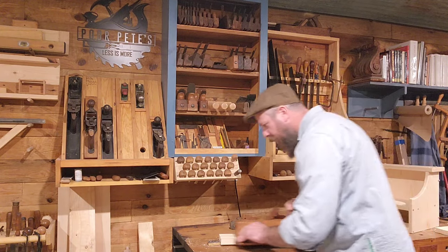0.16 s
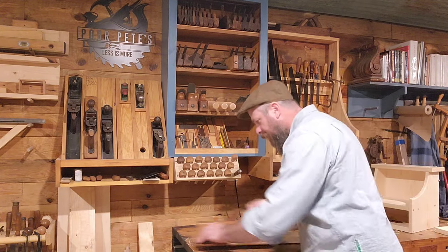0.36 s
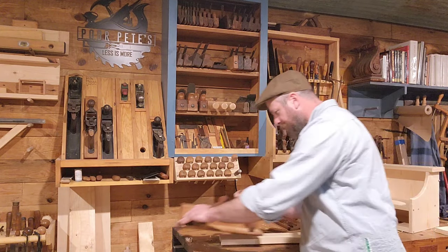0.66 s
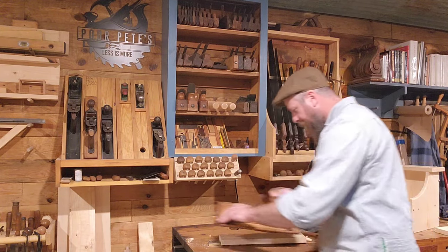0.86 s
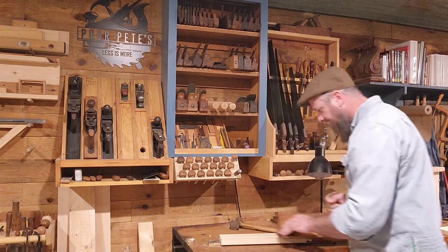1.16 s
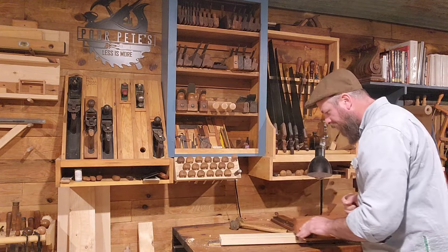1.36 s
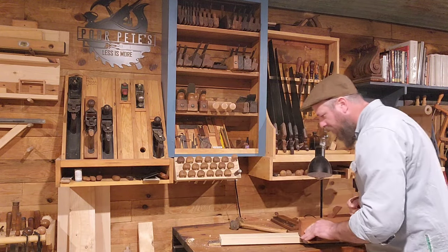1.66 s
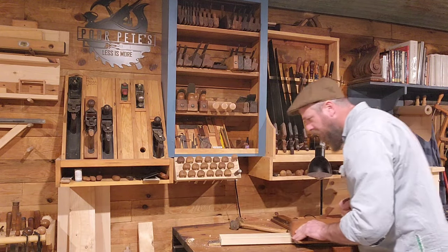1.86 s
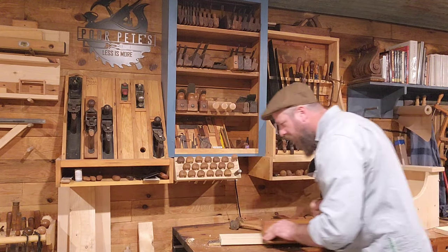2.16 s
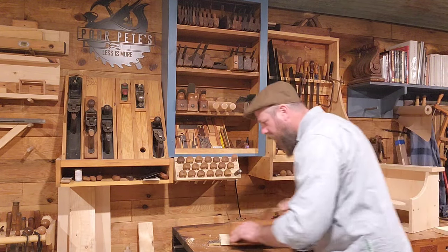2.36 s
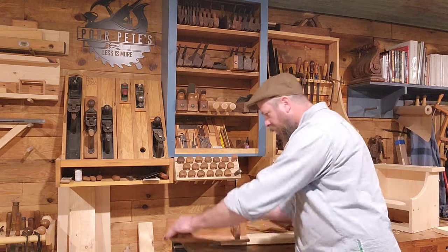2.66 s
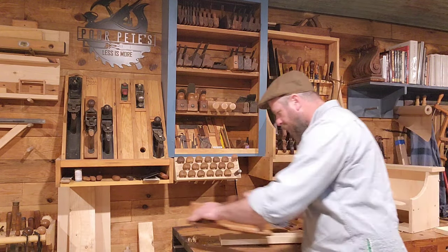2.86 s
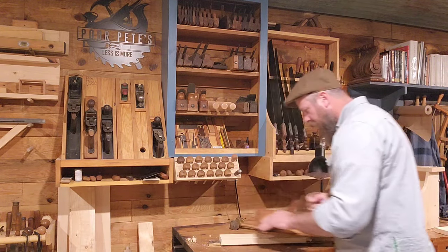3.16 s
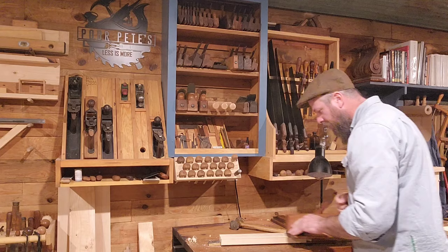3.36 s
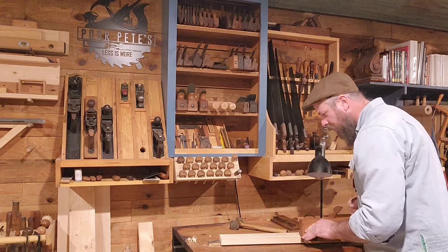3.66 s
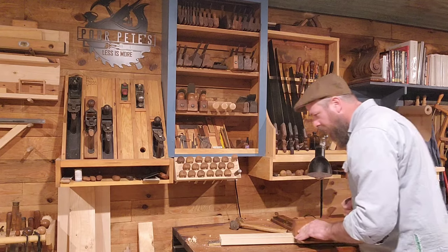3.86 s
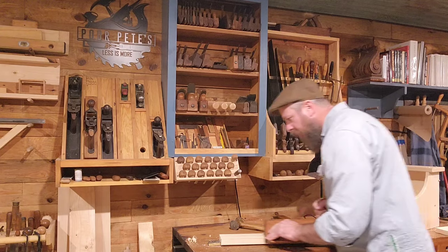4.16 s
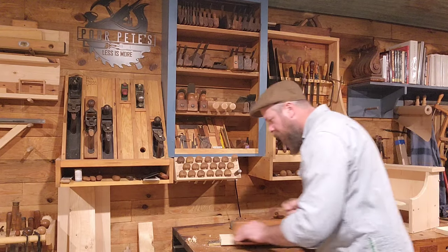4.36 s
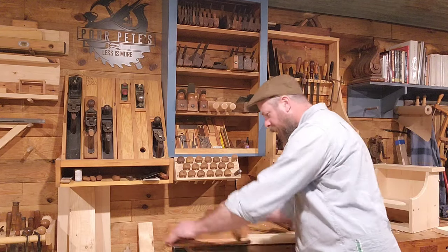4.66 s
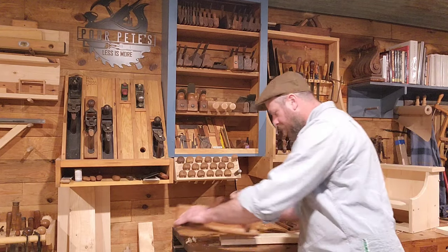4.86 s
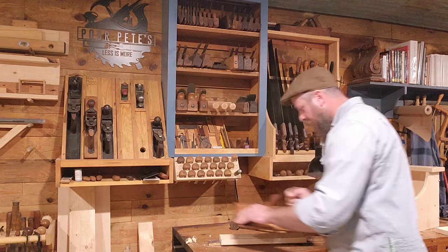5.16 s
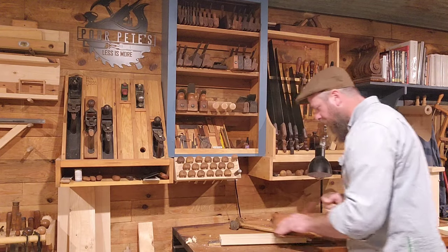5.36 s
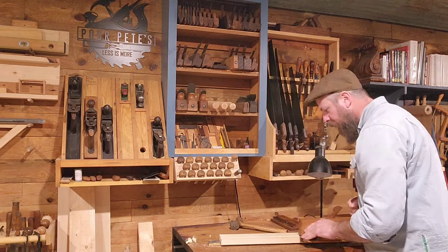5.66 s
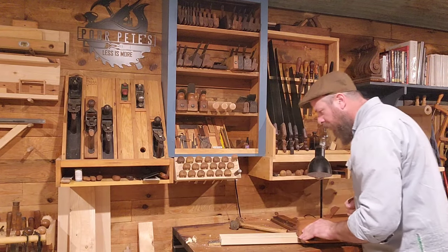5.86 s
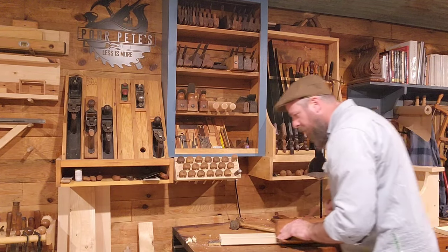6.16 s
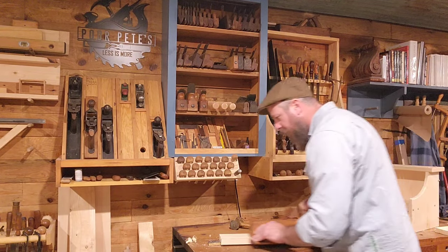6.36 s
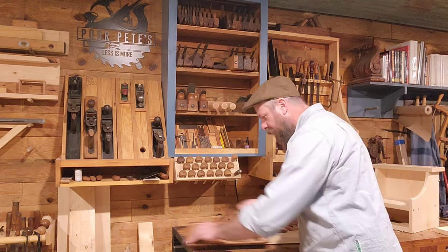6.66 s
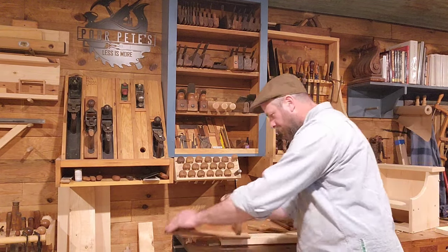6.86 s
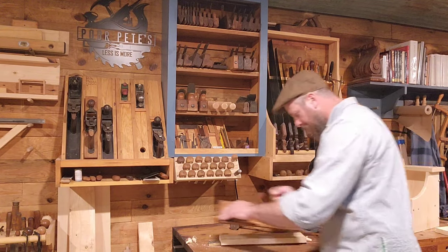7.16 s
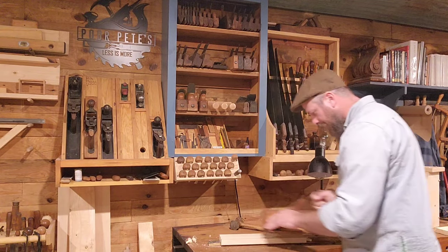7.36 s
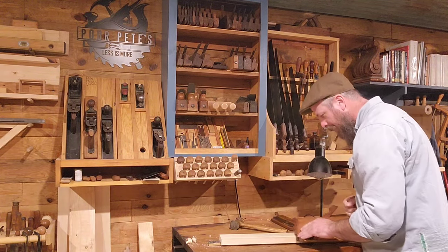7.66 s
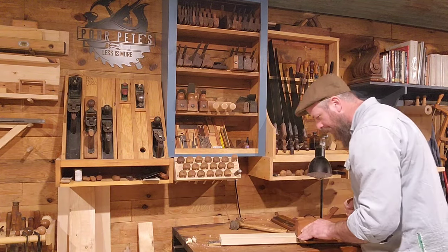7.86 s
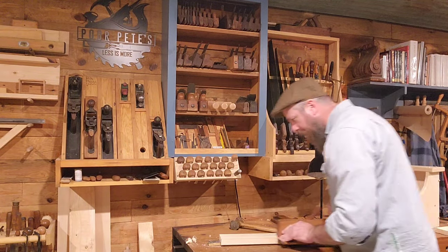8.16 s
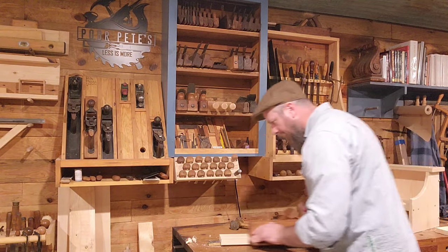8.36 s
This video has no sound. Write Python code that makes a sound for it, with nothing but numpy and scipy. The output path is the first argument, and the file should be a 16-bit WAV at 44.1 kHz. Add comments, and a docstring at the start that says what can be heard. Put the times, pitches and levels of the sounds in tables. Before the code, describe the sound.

Repeated hand planing on a workbench: the first stroke is already starting, then four more at an unhurried, regular pace. The wood sings in a mid-pitched, buzzing scrape with brief chattering notes, growing louder and faster toward the far end, where it breaks off. Quiet gaps hold only faint brushing, then double clunks as the tool lands and a slight slide before the next bite. Short, woody room reflections; quiet room rumble beneath.

```python
"""A wooden plough plane cuts a groove along a board on a workbench, five strokes in a small timber-lined shop.
Snapping fibres are a train of impulses, ever faster along the stroke: they excite the board's modes,
shake plane and bench in a judder and hiss in the shaving, while the iron briefly chatters on single notes.
Between strokes decaying noise through resonances gives knocks and thuds, and shaped noise the rubbing wood.
Decaying reflections make the shop, over low rumble, a faint hum and hiss."""
import sys
import numpy as np
from scipy import signal
from scipy.fft import rfft, irfft, next_fast_len
from scipy.io import wavfile
from scipy.ndimage import uniform_filter1d, map_coordinates

SR = 44100
rng = np.random.default_rng(int(sys.argv[2]) if len(sys.argv) > 2 else 0)


def bounce(signal):
    """Save signal as a 16-bit WAV file at the path given by the first command-line argument."""
    frames = np.transpose(np.atleast_2d(signal))
    limited = np.clip(frames, -1, 1)
    pcm = np.round(limited * 32767).astype(np.int16)
    wavfile.write(sys.argv[1], SR, pcm)


N = 375291

# Levels in the tables are relative: each source applies its own gain, and the shop filters the sum.
# strokes of the plane: iron bites t/s, length/s, stall before the board sings/s, board level/dB,
# shaving hiss level/dB, starting judder level/dB, starting judder length/s, bench thud at the end level/dB,
# run-out rub level/dB, run-out length/s
STROKES = [(-0.06, 0.6, 0.0096, -31.5, -42.5, -38, .11, -47, -56.5, 0.14),
           (2.101, .587, .008, -30, -41.5, -43.5, 0.19, -37, -53.5, 0.11),
           (4.135, .575, 0.1034, -32, -42, -47.5, 0.056, -36.5, -55, 0.19),
           (6.217, .589, 0.017, -31, -41.5, -43.5, 0.21, -36.5, -54.5, 0.15),
           (8.226, 0.54, 0.0072, -31.5, -41, -40, 0.18, -36, -54, .16)]
# modes of the board: f/Hz, width/Hz, level/dB, place 0-1 where the iron drives it hardest,
# loss a whole stroke away/dB
BOARD_MODES = [(513, 31, -10.5, 0.97, 113.5), (527, 30, -9.5, 0.9, 90), (575.2, 11, -9, .8, 71),
               (659.5, 42, -4, 0.5, 25), (758, 50, 0.5, 0, 5.5), (846.4, 30, -4, 0.48, 16.5),
               (979, 62, -9, 0.5, 30.5), (1046, 34, 0, 0.5, 30), (1126, 35, -6, 0.4, 33),
               (1249, 47, -5, 0.6, 26), (1438.5, 27, -1, 0.5, 20.5), (1557, 55, -6, 0.8, 10),
               (1639, 86, -7, 0.68, 27), (1773, 19, -7.5, .85, 25.5), (1908, 31, -10.5, 0.6, 6.5),
               (2099, 90, -7.5, 0.7, 17.5), (2235, 170, -11.5, 1, 14.5)]
# the iron catches and chatters on one note: t/s, level/dB, f/Hz
CATCHES = [(0.112, -24, 762.4), (0.175, -29, 1021), (0.311, -22, 1035), (0.414, -22.5, 549),
           (2.276, -17.5, 767), (2.403, -21, 766), (2.451, -19, 833), (2.49, -17.5, 1097),
           (2.506, -19, 1051), (2.53, -19, 814), (2.579, -19.5, 714.9), (4.235, -29.5, 820),
           (4.335, -19, 796), (4.347, -19.5, 771.7), (4.531, -23.5, 1042), (4.584, -21.5, 699),
           (4.708, -22, 565.7), (6.383, -22.5, 767), (6.545, -20.5, 780), (6.687, -24.5, 1023),
           (8.462, -23, 1095)]
# the plane is set down: fence touches t/s, length of its rub/s, rub level/dB, thud as the weight settles level/dB
LANDINGS = [(1.481, 0.033, -63.5, -51), (3.788, 0.069, -65.5, -45.5), (5.773, .192, -60.5, -39),
            (7.932, 0.068, -63.5, -44)]
CHATTER_HZ = 773  # the iron's usual note
LINGER_S = 0.45  # the hand is back at the near end this long before the next bite


def amp(db):
    """Level to amplitude ratio: 20 dB is a factor of ten."""
    return 10 ** (np.asarray(db) / 20)


def unit(x):
    """Normalise to an rms of 1."""
    return x / np.sqrt(np.mean(x ** 2) + 1e-20)


def along(points, hz):
    """Interpolate (f/Hz, value) points on a logarithmic frequency axis."""
    f, value = np.transpose(points)
    return np.interp(np.log(hz + 1), np.log(f), value)


def clock():
    """Time of every sample in seconds."""
    return np.arange(N) / SR


def gate(spans, edge):
    """A trapezoidal envelope: one inside the spans, with ramps of edge seconds, zero elsewhere."""
    t = clock()
    return sum(np.clip((t - a) / edge, 0, 1) * np.clip((b - t) / edge + 1, 0, 1) for a, b in spans)


def wobble(rate):
    """Low-frequency random modulation: a smooth curve through rate random knots a second."""
    knots = rng.standard_normal(int(N * rate / SR) + 4)
    fine = np.arange(0, len(knots) - 1, 1 / 10)
    return np.interp(clock() * rate, fine, map_coordinates(knots, [fine]))


def add(track, s, sound):
    """Superpose a sound on a track at time s."""
    part = track[max(round(s * SR), 0):][:len(sound)]
    part += sound[:len(part)]


def filtered(x, response):
    """Linear filtering: the spectrum of x times a response of frequency."""
    n = x.shape[-1]
    padded = next_fast_len(n + SR // 4, True)
    return irfft(rfft(x, padded) * response(np.fft.rfftfreq(padded, 1 / SR)), padded)[..., :n]


def coloured(x, spectrum):
    """Spectral shaping of x by (f/Hz, level/dB) points, to rms 1."""
    return unit(filtered(x, lambda hz: amp(along(spectrum, hz))))


def ring(force, modes):
    """Modal superposition: a force drives parallel damped resonators (f/Hz, width/Hz, level/dB)."""
    def response(f):
        total = 0
        for k, (centre, width, db) in enumerate(modes):
            damping = 1j * f * width
            total = total + (-1) ** k * amp(db) * damping / (centre * centre - f * f + damping)
        return total
    return filtered(force, response)


def band(x, lo_hz, hi_hz, order=2):
    """Causal Butterworth band-pass."""
    sos = signal.butter(order, [lo_hz, min(hi_hz, SR * 0.49)], "bandpass", fs=SR, output="sos")
    return signal.sosfilt(sos, x)


def spread(pair, alike):
    """Interaural coherence: two unrelated signals become left and right with a given likeness."""
    def weights(hz):
        turn = np.arccos(np.clip(along(alike, hz), -1, 1)) / 2
        return np.array([np.cos(turn), np.sin(turn)])
    mid, side = filtered(pair, weights)
    return np.array([mid + side, mid - side])


def nearest(table, lead):
    """Per sample, the columns of the row under way; a row takes over lead seconds before its time."""
    rows = np.array(table)
    return rows[np.searchsorted(rows[1:, 0] - lead, clock())].T


def travel():
    """Uniform motion along the board, place 0-1: the plane waits at the near end, then crosses in one stroke."""
    bite, length, *_ = nearest(STROKES, lead=LINGER_S)
    return np.clip((clock() - bite) / length, 0, 1)


def air():
    """Stationary background noise: low rumble and faint hiss, with a hum that wavers in level and phase."""
    # hum tones: f/Hz, level/dB
    tones = [(59, -72), (118, -80)]
    # spectrum of the still air: f/Hz, level/dB per Hz
    air_spectrum = [(20, -5.5), (42, 0), (60, -4.5), (85, -0.5), (120, -7.5), (160, -12), (240, -19.5),
                    (700, -20.5), (2500, -28.5), (5000, -26.5), (9000, -25), (15000, -25.5)]
    # left-right coherence of the air: f/Hz, likeness
    likeness = [(30, 0.13), (100, 0.76), (400, .6), (1500, 0.38), (4000, 0)]
    hum = 0
    for hz, db in tones:
        level = amp(db + 1.7 * wobble(12)) * np.sqrt(2)
        hum = hum + level * np.sin(2 * np.pi * hz * clock() + 0.5 * wobble(4))
    noise = spread(rng.standard_normal((2, N)), likeness)
    return hum + amp(-65.5) * coloured(noise, air_spectrum)


def shop_answer(near_db=-5, near_t60=0.077, far_db=-9):
    """Impulse response from one spot on the bench: direct sound, fast near walls, slower reverberant room."""
    # decay of the room: f/Hz, t60/s
    decay_times = [(80, 0.58), (250, 0.53), (900, 0.31), (4000, 0.19), (12000, 0.26)]
    # stereo width of the shop: f/Hz, side minus mid level/dB
    side_levels = [(80, -22), (200, -19), (380, -8), (700, -4.5), (1300, -4.5), (2400, -2), (4400, -1),
                   (8000, -4)]
    count = SR // 2
    hz, t, z = signal.stft(rng.standard_normal((2, 2, count)), SR, nperseg=256)
    near_decay = amp(-60 * t / near_t60)
    far_decay = amp(-60 * t / along(decay_times, hz)[:, None])
    near = signal.istft(z[0] * near_decay, SR, nperseg=256)[1]
    far = signal.istft(z[1] * far_decay, SR, nperseg=256)[1]
    walls = (amp(near_db) * unit(near) + amp(far_db) * unit(far)) / np.sqrt(count)
    delay = SR // 500  # the first reflection comes 2 ms late
    paths = rfft(np.pad(walls, ((0, 0), (delay, 0))), SR)  # mid and side
    paths[0] += 1  # the direct path
    paths /= np.sqrt(uniform_filter1d(np.abs(paths) ** 2, size=70))  # cluttered walls favour no single note
    mid = paths[0]
    side = paths[1] * amp(along(side_levels, np.fft.rfftfreq(SR, 1 / SR)))
    return irfft([mid + side, mid - side], SR)[:, :count]


def shop(x, place, count=5, lead=0.0001):
    """Moving source: crossfaded impulse responses along the board; sound leads at the left port by lead s."""
    spots = np.arange(count)[:, None]
    shares = np.maximum(1 - np.abs(place * (count - 1) - spots), 0) ** 0.72
    pair = 0
    for share in shares:
        pair = pair + signal.oaconvolve((x * share)[None], shop_answer(), axes=1)[:, :N]
    ears = np.array([[1], [-1]])
    timed = filtered(pair, lambda f: np.exp(1j * np.pi * f * lead * ears))
    return timed * amp([[0.4], [-0.4]])  # dB, left and right


def brushing():
    """Friction noise: a thin hiss swells and fades as the plane's side grazes the board on the way back, and as
    its fence rubs while it is set down."""
    # grazes: t/s, length/s, level/dB
    grazes = [(0.738, .72, -74.5), (1.504, 0.071, -66), (1.64, 0.089, -67.5), (3.237, 0.17, -76),
              (5.781, 0.16, -61), (7.15, .05, -74)]
    # spectrum of the graze: f/Hz, level/dB per Hz
    graze_spectrum = [(1000, -18), (3700, -8), (4500, -2), (5200, 4), (6200, -10.5), (15000, -17.5)]
    t = clock()
    level = 0
    for s, length, db in grazes:
        offset = 2 * (t - s) / length - 1  # -1 to 1 across the graze
        level = level + amp(db) * np.sqrt(np.maximum(1 - offset ** 2, 0))
    return level * coloured(rng.standard_normal(N) * amp(1.2 * wobble(37)), graze_spectrum)


def thuds(settle_t60=0.19):
    """Resonance of a heavy frame: the bench rocks when the iron lets go and when the plane's weight lands."""
    # modes of the bench frame: f/Hz, width/Hz, level/dB
    bench_modes = [(70, 19, 6), (94.5, 34, 2), (134, 37, -4), (286, 220, -8)]
    out, t = np.zeros(N), np.arange(SR // 3) / SR
    releases = [(s + length, db) for s, length, *_, db, _, _ in STROKES]
    settlings = [(s + length, db) for s, length, _, db in LANDINGS]
    for s, db in releases + settlings:
        shove = rng.standard_normal(len(t)) * amp(-60 * t / settle_t60)
        rock = band(ring(shove, bench_modes), 50, 530)
        add(out, s - 0.008, amp(db) * rock / np.abs(rock).max())
    return out


def knocks(tick_t60=0.045, rise=0.00061, rattle_db=2):
    """Impact excitation: wood meets wood in a scuffing blow, heard as board ring, hollow body and dry tick."""
    # plane lifted or set down: t/s, board level/dB, hollow level/dB, tick level/dB, t60 of the scuff/s
    blows = [(0.638, -54, -46.5, -61, 0.056), (1.48, -41, -49.5, -59, 0.13), (1.493, -49, -43, -66, 0.049),
             (1.653, -74, -60, -68, 0.15), (1.726, -42, -51, -57, .13), (3.792, -55, -58.5, -49.5, 0.13),
             (3.818, -37.5, -45, -44.5, 0.13), (3.843, -35, -48, -66, .11), (4.826, -46, -49, -62, 0.11),
             (5.776, -34, -55, -47.5, 0.13), (5.929, -31.5, -45.5, -55, 0.09),
             (5.952, -30.5, -44.5, -51, 0.086), (6.913, -47.5, -47.5, -64, .08),
             (7.152, -61.5, -72.5, -63, 0.072), (7.936, -47, -54, -48.5, 0.21),
             (7.964, -28.5, -51, -39, 0.13), (8.004, -32.5, -46.5, -66, 0.067)]
    # the iron meets the end grain: board level/dB, hollow level/dB, tick level/dB, t60/s
    end_grain = (-37, -47.5, -39, 0.34)
    body_modes = [(293.2, 33, -5.0), (388.7, 44, 1.0), (563, 77, -2.0)]  # f/Hz, width/Hz, level/dB
    # the flat sole damps the board
    damped = [(hz, 2 * width, level / 2) for hz, width, level, *_ in BOARD_MODES]
    bites = [(bite + 0.002, *end_grain) for bite, *_ in STROKES if bite > 0]
    out, t = np.zeros(N), np.arange(SR // 4) / SR

    def peaked(x):
        return x / np.abs(x).max()

    for s, db, hollow_db, tick_db, t60 in [*blows, *bites]:
        steps = amp(rattle_db * rng.standard_normal(len(t)))
        rattle = np.repeat(steps, SR // 400)[:len(t)]  # a new level about 400 times a second
        contact = rng.standard_normal(len(t)) * rattle * (1 - np.exp(-t / rise))
        blow = contact * amp(-60 * t / t60)
        board = peaked(band(ring(blow, damped), 410, 2200, order=1))
        hollow = peaked(band(ring(blow, body_modes), 120, 700))
        tick = peaked(band(contact * amp(-60 * t / tick_t60), 1400, 6200))
        sound = amp(db - 3.0) * board + amp(hollow_db + 2.5) * hollow + amp(tick_db + 5) * tick
        add(out, s - 0.002, sound)
    return out


def sliding():
    """Friction of wood on wood: finely modulated noise as the plane lands, slides to the start and runs out."""
    # spectrum of the sliding sole: f/Hz, level/dB per Hz
    sole_spectrum = [(200, -5.5), (450, 4), (900, -0.5), (1600, 3), (3200, 2), (4700, 2.5), (7000, 2),
                     (15000, -5)]
    settle_db_per_s = 137  # the rub dies once the plane has settled
    approach_db, approach_db_per_s = -56, 77.5  # level at the bite, rise towards it
    run_out_db_per_s = 300  # how fast sole and loose shaving fall quiet after the run-out
    t = clock()
    touch, rubs, fence_db, _ = nearest(LANDINGS, lead=0)
    bite, length, *_, run_out_db, runs_on = nearest(STROKES, lead=LINGER_S)
    past = t - bite - length
    landing = (t > touch) * amp(fence_db - settle_db_per_s * np.maximum(t - touch - rubs, 0))
    approach = (t < bite) * amp(approach_db - approach_db_per_s * np.abs(bite - t))
    run_out = (past > 0) * amp(run_out_db - run_out_db_per_s * np.maximum(past - runs_on, 0))
    rub = rng.standard_normal(N) * amp(1.7 * wobble(76) + 1.8 * wobble(24))
    return (landing + approach + run_out) * coloured(rub, sole_spectrum)


def chatter(length=0.015, gain_db=-6):
    """Self-excited oscillation: the iron locks on to one note for about a dozen cycles, as a decaying sine."""
    out, t = np.zeros(N), np.arange(int(length * SR)) / SR
    swell = np.sqrt(np.sin(np.pi * t / length))
    for s, db, hz in CATCHES:
        level = amp(db + gain_db - 170 * t)
        add(out, s - 0.005, level * swell * np.sin(2 * np.pi * hz * t))
    return out


def chatter_pitch(place):
    """Frequency pulling: the iron's note sags towards the far end; a catch pulls it to its own note."""
    sag_from, sag_hz = 0.68, 280  # place 0-1 where the note starts to fall, its fall by the far end
    lock_s = 0.039  # how long a catch holds another note
    t = clock()[::100]  # the pitch moves slowly
    s, _, hz = np.transpose(CATCHES)
    pull = np.exp(-((t[:, None] - s) / lock_s) ** 2)
    sag = np.interp(np.interp(t, clock(), place), [sag_from, 1], [0, 1])
    usual = CHATTER_HZ - sag_hz * sag
    shift = (pull * (hz - usual[:, None])).sum(1) / np.maximum(pull.sum(1), 1)
    return np.interp(clock(), t, usual + shift)


def fractures(rate, scatter, size_db):
    """Impulse train of fracture: fibres snap rate times a second, scattered in time and size; even power."""
    count = np.cumsum(rate) / SR
    chance = rng.standard_normal((int(count[-1]), 2))
    turns = np.arange(len(chance)) + scatter * chance[:, 0]
    at = np.searchsorted(count, turns).clip(0, N - 1)
    snaps = np.bincount(at, amp(size_db * chance[:, 1]), N) / np.sqrt(rate)
    return unit(snaps - snaps.mean())


def board_ring(force, place, chatter_hz, lock_db=6, lock_octaves=0.29, shift_db=3):
    """Modal excitation: a mode answers most with the iron near its antinode and chattering near its pitch."""
    brighten_db = 3  # gain of the upper modes, per octave, from the near end to the far end
    shares, rings = [], []
    for k, (hz, width, db, best, loss) in enumerate(BOARD_MODES):
        locked = lock_db * np.exp(-(np.log2(chatter_hz / hz) / lock_octaves) ** 2)
        bright = brighten_db * (place - 0.5) * max(np.log2(hz / CHATTER_HZ), 0)
        off_antinode = loss * (place - best) ** 2
        shares.append(amp(db - off_antinode + locked + bright + shift_db * wobble(22)))
        rings.append((-1) ** k * unit(band(force, hz - width / 2, hz + width / 2, order=1)))
    return np.sum(np.multiply(shares, rings), axis=0) / np.linalg.norm(shares, axis=0)


def cutting(place):
    """Fracture-driven vibration: tearing fibres drive board, plane and shaving; speed sets rates and levels."""
    # plane and bench top shaking together: f/Hz, width/Hz, level/dB
    judder_modes = [(86, 17, -7), (204, 33, -10), (280.7, 24, 0), (399, 50, -3.5)]
    # spectrum of the shaving: f/Hz, level/dB per Hz
    shaving_spectrum = [(300, -24), (600, -11.5), (1500, 5), (2200, -1.5), (2700, 0.5), (4000, 1),
                        (5500, 1.5), (8000, 4.5), (15000, -2.5)]
    slow_board_db, slow_hiss_db = -11, -12  # board and shaving at rest, against full speed
    bite_hiss_db, bite_s = 9, 0.034  # the shaving starts with a rasp that dies in this time
    exit_hiss_db, exit_s = 4.5, 0.055  # and tears off the far end over this time
    running_judder_db, exit_judder_db = -54.5, 10  # judder once under way, its rise at the far end
    judder_fade_s = 0.018
    silent_db, swell_s = -14, 0.004  # the board during the stall, and how fast it then starts to sing

    bite, length, stall, board_db, hiss_db, start_db, judder_s, *_ = nearest(STROKES, lead=LINGER_S)
    age = clock() - bite
    speed = np.sin(np.pi / 2 * place)  # rates and levels rise along the board, fast at first, then levelling off
    entering = np.exp(-(age / bite_s) ** 2)
    leaving = np.exp(-(np.maximum(length - age, 0) / exit_s) ** 2)
    stalled = np.clip((stall - age) / swell_s + 1, 0, 1)
    starting = (1 - np.tanh((age - judder_s) / judder_fade_s)) / 2
    board_db = board_db + slow_board_db * (1 - speed) ** 1.25 + silent_db * stalled
    hiss_db = hiss_db + slow_hiss_db * (1 - speed) + bite_hiss_db * entering + exit_hiss_db * leaving
    judder_db = start_db * starting + running_judder_db * (1 - starting) + exit_judder_db * leaving
    biting = gate([(s, s + lasts) for s, lasts, *_ in STROKES], edge=0.008)

    grain = amp(1.0 * wobble(70) + 1.2 * wobble(20))  # hard and soft wood pass under the iron
    force = grain * fractures(260 + 900 * speed, scatter=1.2, size_db=0.5)
    ringing = board_ring(force, place, chatter_pitch(place))
    board = unit(band(ringing, 400, 3200)) * amp(board_db - 1)

    skips = fractures(np.full(N, 280.0), scatter=0.6, size_db=3)  # the whole plane skips at a steady mean rate
    judder = unit(band(ring(skips, judder_modes), 50, 810)) * amp(judder_db - 3.0)

    crackle = fractures(700 + 1800 * speed, scatter=2, size_db=5.0)
    curl = amp(1.4 * wobble(25))  # the shaving curls and breaks unevenly
    tearing = grain * curl * (crackle + 0.5 * rng.standard_normal(N))
    hiss = coloured(tearing, shaving_spectrum) * amp(hiss_db + 7.0)
    return biting * (board + judder + hiss)


def scene():
    """Superposition: every source on the bench sounds through the shop, over the still air."""
    place = travel()
    bench = cutting(place) + chatter() + sliding() + brushing() + knocks() + thuds()
    return shop(bench, place) + air()


def record(dry):
    """Port response: each microphone port colours the treble its own way; nothing passes the band limit."""
    # colour of the two ports, with a deep notch: f/Hz, left level/dB, right level/dB
    port_colours = np.array([(2470, 2, 2), (3814, 1, 1), (4640, 0, 6.5), (5454, 5, -3), (6720, -9, -22),
                             (7330, -5.5, -16), (8290, -21.5, -44.5), (8700, -53.5, -54),
                             (10320, -21.5, -37), (12500, -15, -21), (15430, -11.5, -22.5)])
    top_hz = 15800
    left, right = port_colours[:, [0, 1]], port_colours[:, [0, 2]]
    return filtered(dry, lambda hz: amp([along(left, hz), along(right, hz)]) * (hz < top_hz))


dry = scene()
out = record(dry)
bounce(out)
```